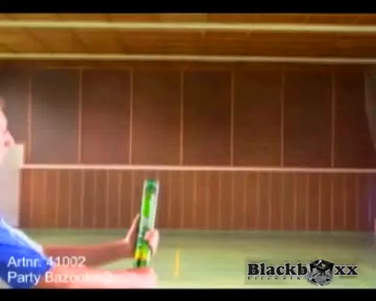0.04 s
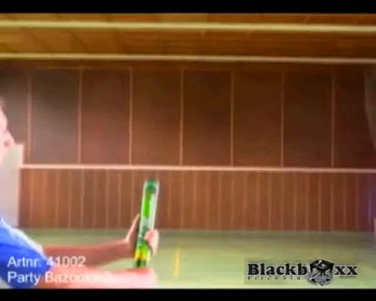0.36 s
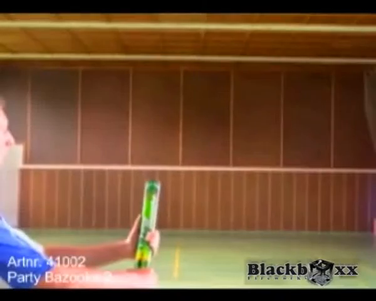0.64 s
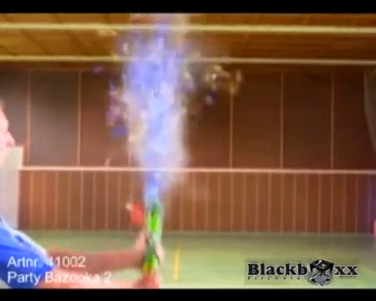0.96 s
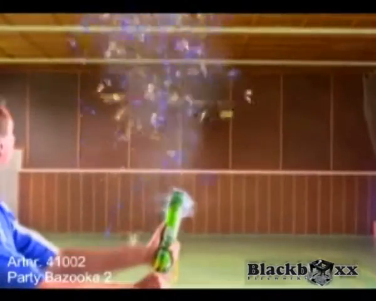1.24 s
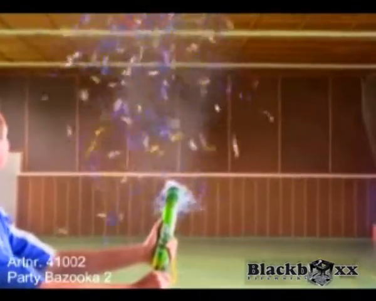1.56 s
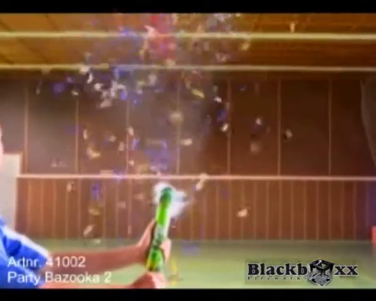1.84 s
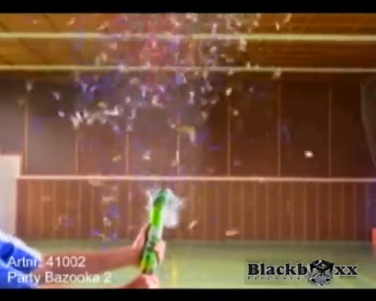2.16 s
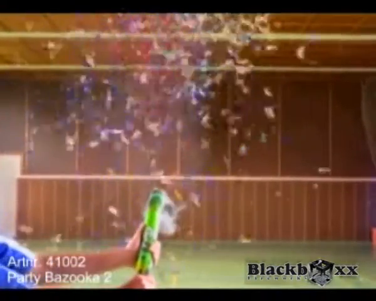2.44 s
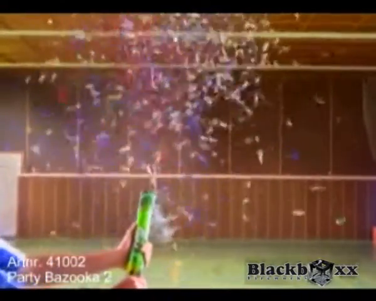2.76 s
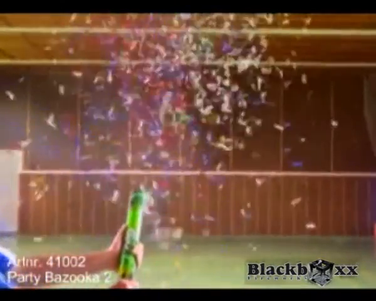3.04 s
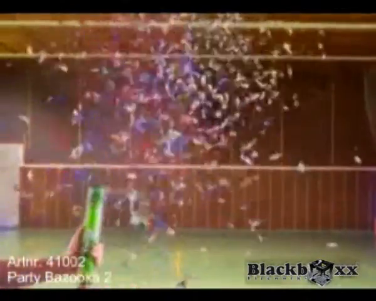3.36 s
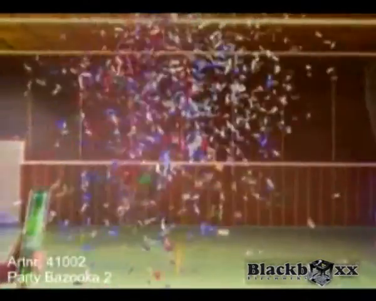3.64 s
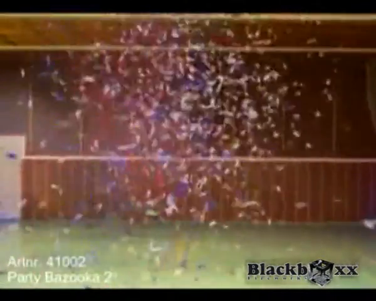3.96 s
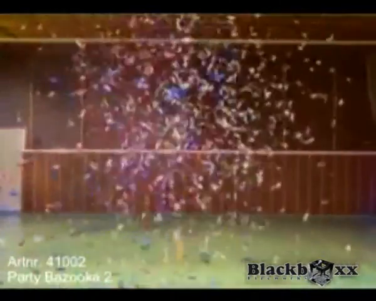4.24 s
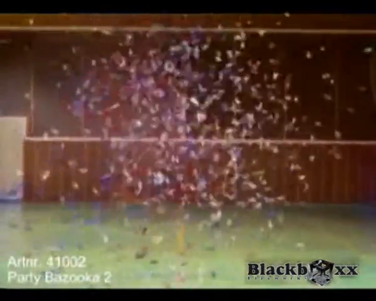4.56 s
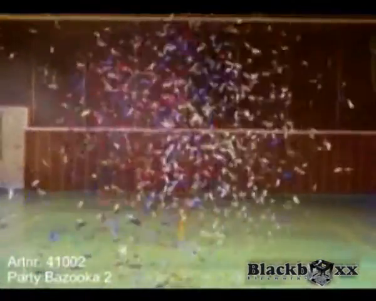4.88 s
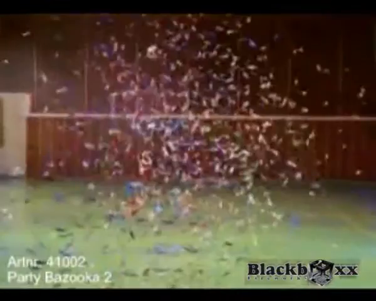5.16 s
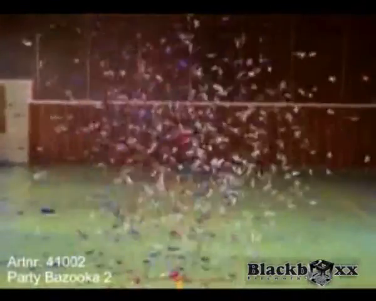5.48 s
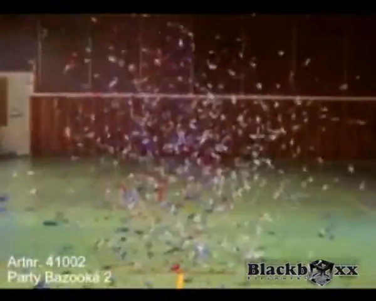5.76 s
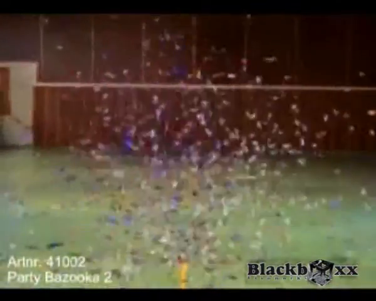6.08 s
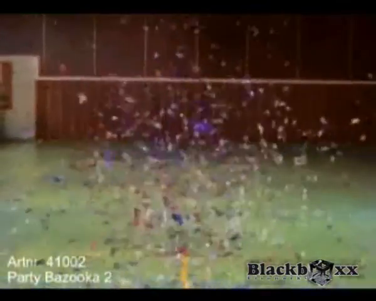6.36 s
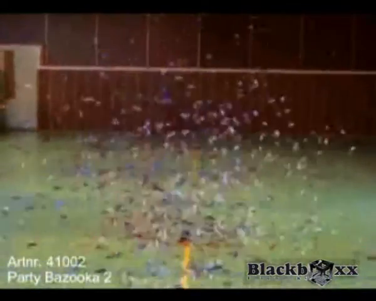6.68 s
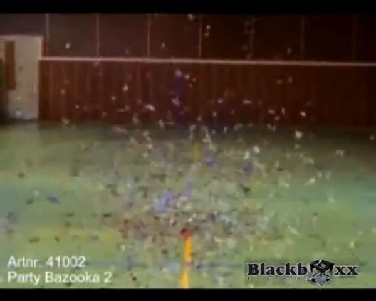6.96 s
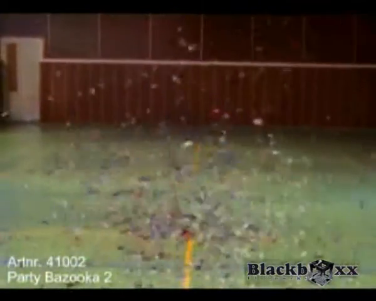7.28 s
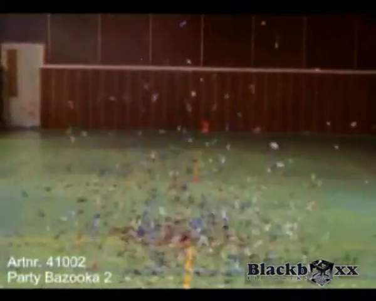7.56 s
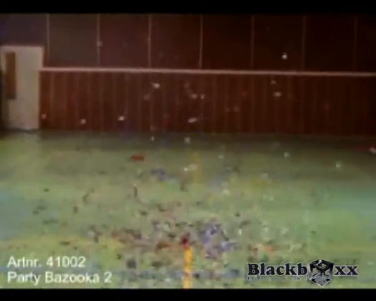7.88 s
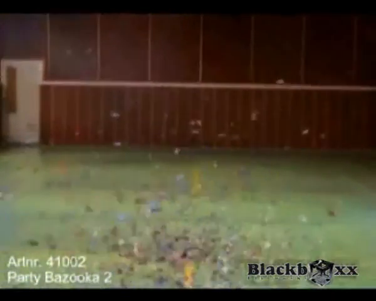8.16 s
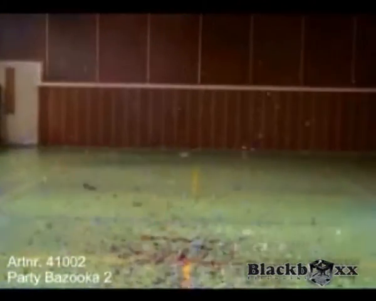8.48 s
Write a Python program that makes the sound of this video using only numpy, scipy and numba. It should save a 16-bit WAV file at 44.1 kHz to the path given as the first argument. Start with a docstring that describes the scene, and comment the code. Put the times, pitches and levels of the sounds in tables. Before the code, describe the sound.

In a quiet sports hall, hands knock and briefly twist a cardboard confetti cannon. It bursts with a sharp, loud bang that overloads the close microphone and echoes for seconds, leaving a low ring. Paper strips flutter overhead, then patter lightly on the floor with scattered crisp ticks, while a few soft footsteps thud on the springy floor.

```python
"""Confetti cannon in a sports hall

A hand-held compressed-air cannon is twisted until its seal bursts. The bang rings round the hall
for seconds and overloads a camcorder, whose automatic volume control holds it level, then lets go.
Paper flutters overhead and patters on to the floor while the shooter takes a few steps away."""
import sys
import numpy as np
from scipy import signal
from scipy.fft import rfft, irfft, next_fast_len
from scipy.io import wavfile
from scipy.ndimage import uniform_filter1d, map_coordinates
from numba import njit

SR = 44100
rng = np.random.default_rng(int(sys.argv[2]) if len(sys.argv) > 2 else 0)


def to_wav(sig):
    """Store sig (one row per channel, or 1-D mono) as 16-bit WAV at the path in sys.argv[1].

    Samples outside -1..1 are clipped; the rate is SR.
    """
    pcm = np.clip(np.atleast_2d(sig), -1, 1) * 32767
    pcm = np.round(pcm).astype(np.int16)
    wavfile.write(sys.argv[1], SR, pcm.T)  # frames by channels


N = 384552
T = np.arange(N) / SR
FIRE_S, BLAST_S = 1.1088, 1.1118  # the seal bursts; the air leaves the tube


def amp(db):
    """Turn decibels into a number to multiply a sound by."""
    return 10 ** (np.asarray(db) / 20)


def value_at(table, hz):
    """Look up a pitch in rows of (Hz, value), sliding smoothly from one row to the next."""
    pitches, values = np.transpose(table)
    return np.interp(np.log(np.maximum(hz, 1)), np.log(pitches), values)


def colour(x, tone, keep_power=True):
    """Shape a sound's tone by rows of (Hz, dB); with keep_power, white noise stays equally strong."""
    size = next_fast_len(N + SR // 2, True)
    size += size % 2
    gain = amp(value_at(tone, np.fft.rfftfreq(size, 1 / SR)))
    if keep_power:
        gain /= np.sqrt(np.mean(gain ** 2))
    # fold the filter so that it rings only after a sound, never before it
    cepstrum = irfft(np.log(gain))
    cepstrum[1:size // 2] *= 2
    cepstrum[size // 2 + 1:] = 0
    return irfft(rfft(x, size) * np.exp(rfft(cepstrum)), size)[..., :N]


def noise(spread):
    """White noise at two close microphones; spread sets how much left and right differ."""
    shared, side = rng.standard_normal((2, N))
    return (shared + spread * side * np.array([[1], [-1]])) / np.hypot(1, spread)


def grains(per_s, scatter_db, spread):
    """Tiny hits at random times, each with its own size and direction."""
    chance, size, side = rng.random(N), rng.standard_normal(N), rng.standard_normal(N)
    strength = amp(scatter_db * np.minimum(size, 3))
    hits = (chance < per_s / SR) * strength * rng.choice([-1, 1], N)
    return hits / hits.std() * (1 + spread * side * np.array([[1], [-1]]))


def bursts(table, spread):
    """Short puffs of noise. Each row: start in seconds, level in dB, fade time in seconds."""
    envelope, age = np.zeros(N), T[:SR // 3]
    for start_s, db, fade_s in table:
        start = int(start_s * SR)
        envelope[start:start + len(age)] += (amp(db) * np.exp(-age / fade_s))[:N - start]
    return envelope * noise(spread)


def swells(table):
    """Smooth rises and falls. Each row: middle in seconds, height, half-width in seconds."""
    return sum(height * np.exp(-((T - middle_s) / width_s) ** 2) for middle_s, height, width_s in table)


def wander(per_s):
    """A smooth random drift, mostly between -1 and 1, that heads somewhere new per_s times a second."""
    size = int(SR / per_s)
    held = np.repeat(rng.standard_normal(N // size + 1), size)[:N]
    return 1.3 * uniform_filter1d(uniform_filter1d(held, size), size)


def hall_air():
    """The low, steady air noise of the empty hall, a little louder on the left."""
    # Each row: pitch in Hz, level in dB per Hz.
    tone = [(20, -73), (50, -78), (170, -75.5), (320, -79), (600, -81.5), (1050, -83), (1800, -85),
            (3000, -90.5), (5500, -91.5), (9000, -99), (12500, -105)]
    hush = colour(noise(spread=0.098), tone, keep_power=False) * np.sqrt(SR / 2)
    return hush * amp(np.array([[1.0], [-2.5]]))


def hall_echo(spread=0.069, treble_spread=0.1):
    """Dense echoes that fade at their own rate at each pitch; left and right differ more in the treble."""
    # Each row: pitch in Hz, seconds the echo takes to fade by 60 dB.
    fade_times = [(60, 1.1), (220, 1.01), (350, 1.82), (500, 2.45), (750, 2.723), (1200, 3.267),
                  (1900, 2.98), (3000, 1.88), (5000, 1.8), (7500, 1.54), (12000, 1.76)]
    hz, seconds, (shared, side) = signal.stft(rng.standard_normal((2, N)), SR, nperseg=1024)
    width = (spread + treble_spread * np.clip(hz / 2500 - .4, 0, 1))[:, None]
    echoes = np.array([shared + width * side, shared - width * side])
    fade = np.exp(-np.log(1000) * seconds / value_at(fade_times, hz)[:, None])
    return signal.istft(echoes * fade, SR)[1][:, :N]


def footsteps():
    """The shooter's feet thud on the springy floor."""
    # Each row is a footfall: start in seconds, level in dB, fade time in seconds.
    footfalls = [(3.568, -29.5, 0.012), (4.416, -30.5, 0.018), (5.222, -33.5, 0.012), (5.255, -38, 0.021),
                 (6.236, -37.5, 0.037)]
    # Each row: pitch in Hz, how strongly the floor sounds there in dB.
    floor_tone = [(40, -22), (110, -6), (200, -1), (370, -2.5), (520, -4.5), (700, -7.5), (1200, -10),
                  (5000, -44)]
    return colour(bursts(footfalls, spread=0.084), floor_tone)


def twist(scrape_s=1.008, ease_s=1.056, scrape_db=-39.5, ease_db_per_s=350):
    """Hands knock the cardboard tube; the grip scrapes, catches and eases off just before the bang."""
    # Each row is a knock or a catch: start in seconds, level in dB, fade time in seconds.
    knocks = [(.927, -30, 0.005), (.939, -38.5, 0.015)]
    catches = [(1.010, -27.5, 0.0025), (1.022, -34, .002), (1.067, -41, .002)]
    # Each row: pitch in Hz, how strongly the tube or the grip sounds there in dB.
    tube_tone = [(200, -24), (500, -12), (720, -0.5), (1050, -17), (1500, -5), (2500, -20), (7000, -28),
                 (12000, -32)]
    grip_tone = [(150, -12), (700, 5), (1800, -2), (3200, 6), (7000, 0.5), (12000, -8)]
    rub = grains(per_s=9000, scatter_db=4, spread=.2)
    easing_db = ease_db_per_s * np.maximum(T - ease_s, 0)
    scrape = amp(scrape_db - easing_db) * rub * (T > scrape_s) * (T < FIRE_S)
    grip = colour(scrape + bursts(catches, spread=.15), grip_tone)
    return grip + colour(bursts(knocks, spread=.15), tube_tone)


def paper_ticks(crinkle=0.24):
    """Larger, stiff pieces land on their edges: one snap each, then a brief crinkle."""
    # Each row: start in seconds, peak level in dB, crinkle fade time in seconds, pitch in Hz.
    landings = [(4.262, -15, 0.0011, 9120), (4.271, -14, 0.0024, 8000), (4.574, -37, 0.0022, 9900),
                (5.53, -24.5, 0.017, 8400), (6.411, -24, .003, 8000), (7.205, -20, 0.0036, 8500),
                (7.332, -18.5, .002, 4000), (7.351, -20.5, 0.0096, 3000), (7.817, -23, .005, 6000),
                (8.045, -19, .001, 6030), (8.291, -21, 0.0028, 4000), (8.352, -13, .003, 10000),
                (8.365, -25, .009, 5000)]
    out, size = np.zeros((2, N + SR)), 4096
    for start_s, db, fade_s, hz in landings:
        push = crinkle * np.exp(-T[:size] / fade_s) * rng.standard_normal(size)
        push[0] = 1  # the snap
        band = signal.butter(1, [hz / 2.1, min(hz * 1.85, .4 * SR)], "band", fs=SR, output="sos")
        tick = signal.sosfilt(band, push)
        start = int(start_s * SR)
        out[:, start:start + size] += amp(db) * tick / np.abs(tick).max()
    return out[:, :N]


def paper_patter(clump_db=.8, thinning_s=8.5, thinning_db_per_s=10, stray_db=-16):
    """Paper taps on the floor in three waves; handfuls brush past and stray pieces tick."""
    # Each row is a wave: time it is half built up in seconds, level in dB, build-up time in seconds.
    waves = [(4.15, -42, 0.21), (6.42, -41, 0.055), (7.25, -49, .08)]
    # Each row is a passing handful: middle in seconds, level in dB, half-width in seconds.
    handfuls = [(2.774, -28, 0.078), (2.979, -35.5, 0.058), (3.488, -39.5, 0.56), (5.738, -41, 0.071),
                (7.48, -41.5, 0.15), (8.372, -37, 0.074)]
    # Each row: pitch in Hz, how strongly the taps sound there in dB.
    tone = [(100, -7), (400, -3), (1200, 1), (2000, 1.5), (3200, 3), (5200, 3), (7500, 1), (9500, -2.5),
            (11500, -4.5), (13000, -20)]
    power = sum(amp(db) ** 2 * (1 + np.tanh((T - at_s) / build_s)) / 2 for at_s, db, build_s in waves)
    waver_db = clump_db * wander(per_s=7)  # the paper comes down in loose clumps
    thinning_db = thinning_db_per_s * np.maximum(T - thinning_s, 0)  # most of it is down by then
    patter_level = np.sqrt(power) * amp(waver_db - thinning_db)
    swish_level = swells([(middle_s, amp(db), width_s) for middle_s, db, width_s in handfuls])
    taps = grains(per_s=16000, scatter_db=3.5, spread=0.22)
    strays = amp(stray_db) * grains(per_s=22, scatter_db=2, spread=.2)
    return colour(np.hypot(patter_level, swish_level) * taps + patter_level * strays, tone)


def paper_flutter(level_db=-15, open_s=2.04, slowing_db_per_s=12.5, glide_s=3.1, glide_db_per_s=6.5):
    """Thousands of strips flap overhead: steady as the cloud opens, softer as they slow, then glide."""
    # Each row is a brief surge: middle in seconds, extra level in dB, half-width in seconds.
    surges = [(1.84, 10, 0.024), (2.22, 5.5, 0.031), (2.44, 4.5, 0.068), (2.58, 4.5, 0.019)]
    # Each row: pitch in Hz, how strongly the flapping sounds there in dB.
    tone = [(500, -15.5), (1500, 2.5), (3000, 3), (4200, -3), (6500, -13.5), (11000, -16.5), (13000, -39.5)]
    slowing_db = slowing_db_per_s * np.maximum(T - open_s, 0)
    gliding_db = glide_db_per_s * np.maximum(T - glide_s, 0)
    flaps = colour(grains(per_s=9000, scatter_db=1.5, spread=0.21), tone)
    return amp(level_db - slowing_db - gliding_db + swells(surges)) * (T > BLAST_S) * flaps


def bang(hall, crack_db=3, rise_s=.0009, fade_s=.008):
    """The seal cracks, then the blast of air fills the hall and leaves a few low tones ringing."""
    # Each row: pitch in Hz, how strongly the tearing seal or the blast sounds there in dB.
    crack_tone = [(300, -18), (1200, -6), (2500, 0), (5500, 0), (7500, -5), (10000, -3), (13000, -14)]
    blast_tone = [(60, -27), (130, -19.5), (240, -6.5), (350, -11.5), (435, -18.5), (490, -10), (630, -9),
                  (740, -15.5), (900, -8.5), (1240, -7.5), (1600, -19.5), (3000, -19.5), (5500, -23),
                  (11000, -37), (12500, -54)]
    # Each row is a tone of the hall: pitch in Hz, level in dB, seconds to fade by 60 dB.
    low_tones = [(152, -28.5, 5.64), (221, -30.5, 4.2), (300.5, -18, 4.58)]
    age = T - FIRE_S
    envelope = np.exp(np.minimum(age / rise_s, -age / fade_s))
    crack = colour(envelope * noise(spread=0.45), crack_tone)
    blast = colour(hall, blast_tone, keep_power=False) * np.sqrt(SR / 2)
    ringing = sum(amp(db) * np.sin(2 * np.pi * hz * T) * np.exp(-np.log(1000) * T / ring_s)
                  for hz, db, ring_s in low_tones)
    boom = np.pad(blast + ringing, ((0, 0), (int(BLAST_S * SR), 0)))[:, :N]  # starts at BLAST_S
    return amp(crack_db) * crack + boom


def scene(close_echo_db=-3):
    """Bang, paper and small close sounds, all in the same hall."""
    hall = hall_echo()
    walls = hall / np.sqrt(np.sum(hall[0] ** 2))  # scaled so an echo is as strong as its source
    close = twist() + paper_ticks()
    steps = footsteps()
    echoes = signal.fftconvolve(amp(close_echo_db) * close + steps, walls, axes=1)[:, :N]
    return hall_air() + echoes + steps + close + bang(hall) + paper_flutter() + paper_patter()


@njit
def follow_level(x, rise_s, fall_s):
    """Track how loud a sound is, with one speed for going up and another for coming down."""
    rise, fall = 1 / (1 + rise_s * SR), 1 / (1 + fall_s * SR)
    level, now = np.empty(len(x)), 0.
    for i in range(len(x)):
        now += (x[i] - now) * (rise if x[i] > now else fall)
        level[i] = now
    return level


def record(dry, on_s=.444, hold_db=4, knee=1.15, ceiling=1.3, bias=0.025, balance_db=5.3, top_hz=12480):
    """The camcorder comes on, turns loud sound down, overloads and cuts off the highest treble."""
    body_echo, body_lag_s = 0.18, .00049  # sound bounces off the camcorder's body
    bounce = np.array([map_coordinates(side, [(T - body_lag_s) * SR]) for side in dry])
    x = dry - body_echo * bounce
    level = follow_level(np.abs(x).max(axis=0), rise_s=.0005, fall_s=0.24)
    x = x / (1 + (level / amp(hold_db)) ** knee) ** (1 / knee)  # automatic volume control
    # squashing the wave's tops and bottoms unevenly adds a rough rumble and a fizz to the loud ring
    x = ceiling * (np.tanh(x / ceiling + bias) - np.tanh(bias))
    x = signal.sosfilt(signal.butter(1, 20, "high", fs=SR, output="sos"), x)
    balance = amp(np.array([[balance_db], [-balance_db]]) / 2)
    x = np.clip(x * balance, -1, 1) * (T >= on_s)  # the louder left side hits the limit
    return signal.sosfiltfilt(signal.ellip(8, .1, 60, top_hz, fs=SR, output="sos"), x)


dry = scene()
out = record(dry)
to_wav(out)
```